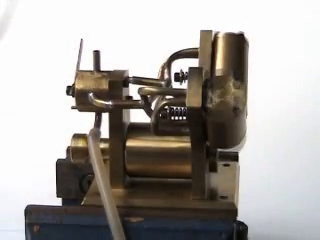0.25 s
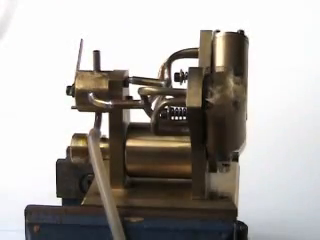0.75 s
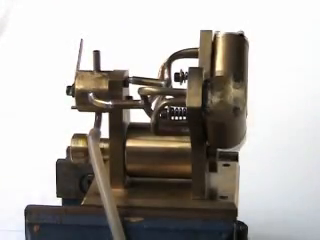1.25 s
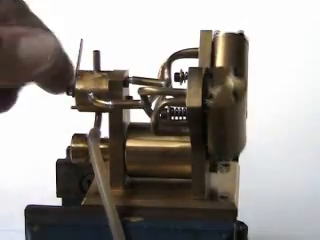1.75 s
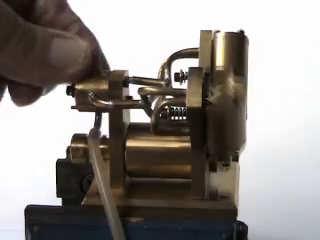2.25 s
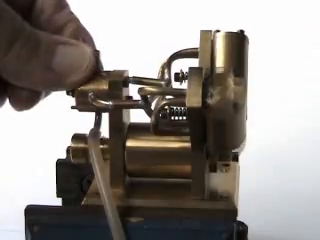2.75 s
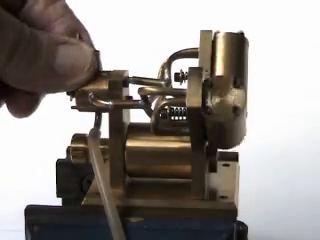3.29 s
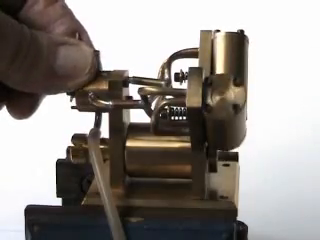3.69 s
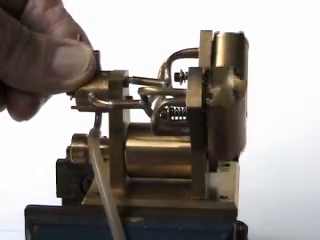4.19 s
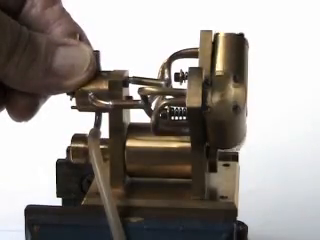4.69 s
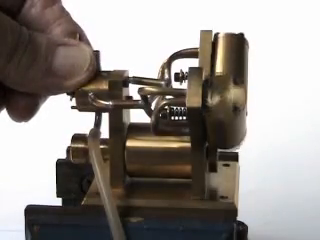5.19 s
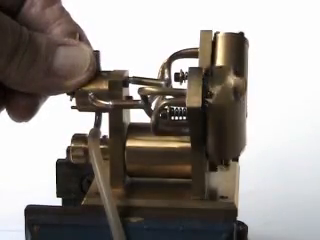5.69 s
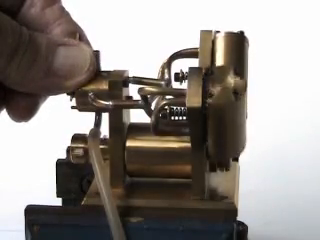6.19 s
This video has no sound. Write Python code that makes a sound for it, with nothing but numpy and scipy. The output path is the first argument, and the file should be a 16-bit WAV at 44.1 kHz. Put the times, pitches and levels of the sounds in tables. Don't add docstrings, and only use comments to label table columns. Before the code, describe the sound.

Rapid even air-exhaust chuffing with rattling metal parts drops away, nearly stops in a faint hiss, then picks up again, slower, quieter and clackier.

```python
import sys
import numpy as np
from scipy import signal
from scipy.fft import rfft, irfft, next_fast_len
from scipy.io import wavfile
from scipy.ndimage import uniform_filter1d, map_coordinates

SR = 44100
rng = np.random.default_rng(int(sys.argv[2]) if len(sys.argv) > 2 else 0)


def volts(x):
    e = np.asarray(x, float) / 20
    return 10 ** e


def pcm_store(signal):
    levels = np.round(np.clip(np.atleast_2d(signal), -1, 1) * 32767)
    wavfile.write(sys.argv[1], SR, levels.astype(np.int16).T)


N = 284004


def unit(x):
    return x / np.sqrt(np.mean(x ** 2) + 1e-20)


def along(points, hz):
    f, v = np.transpose(points)
    return np.interp(np.log(hz + 1), np.log(f + 1), v)


def curves(rows):
    s, *cols = np.transpose(rows)
    return [np.interp(np.arange(N) / SR, s, c) for c in cols]


def wobble(rate):
    knots = rng.standard_normal(int(N * rate / SR) + 4)
    return map_coordinates(knots, [np.arange(N) * rate / SR])


def filtered(x, response):
    m = next_fast_len(N + SR // 2)
    return irfft(rfft(x, m) * response(np.fft.rfftfreq(m, 1 / SR)), m)[..., :N]


def causal(gain):
    c = irfft(np.log(gain + 1e-6))
    c[1:len(c) // 2] *= 2
    c[len(c) // 2 + 1:] = 0
    return np.exp(rfft(c))[:len(gain)]


def unit_gain(response):
    return np.sqrt(np.mean(abs(response(np.linspace(1, SR / 2, num=2000))) ** 2))


def mode(f, hz, width):
    return 1j * f * width / (hz * hz - f * f + 1j * f * width)


def ringing(part):
    ring = lambda f: sum((-1) ** j * volts(db) * mode(f, hz, w) for j, (hz, w, db) in enumerate(part))
    return lambda f: ring(f) / unit_gain(ring)


# frequency [Hz], level [dB per Hz].
ROOM_TONE = [(15, -66), (30, -22), (40, -8.5), (58, -4.5), (129, -8.5), (212, -14.5), (495, -19.5),
             (1090, -19), (2500, -21), (5500, -55), (10000, -44.5)]


def room_tone():
    apart = .45
    noise = rng.standard_normal(N) + apart * rng.standard_normal((2, N))
    pair = filtered(noise, lambda f: volts(along(ROOM_TONE, f)))
    drift_db = .7 * wobble(3)
    return volts(-48.5 + drift_db) * unit(pair) * volts([[-1.2], [1.2]])


# frequency [Hz], time to die by 60 dB [s].
WALL_DECAY = [(150, 0.51), (1000, 0.43), (4000, 0.031), (10000, 0.1)]


def workshop(x):
    hz, t, z = signal.stft(rng.standard_normal((2, SR // 2)), SR, nperseg=256)
    decay = volts(-60 * t / along(WALL_DECAY, hz)[:, None])
    tail = signal.istft(z * decay, SR, nperseg=256)[1]
    delayed = np.pad(x, (300, 0))
    return signal.fftconvolve(delayed[None], tail / np.linalg.norm(tail[0]), axes=1)[:, :N]


# mode frequency [Hz], width [Hz], level [dB].
BASE_MODES = [(170, 99, -4.5), (223.7, 65, -3.5), (329.7, 32.4, -0.5), (354.8, 14.7, 2), (389, 69, -2)]
FRAME_MODES = [(608, 93, 0.83), (659, 76, 4.4)]
POST_MODES = [(796, 64, -5.5), (906.6, 38, 1.5), (1028, 104, -7)]
PIN_MODES = [(1213, 96, -3.5), (1494, 117, -2.5), (1706, 200, -3.5), (2283, 330, -5), (2653, 130, -16.5)]
SPRING_MODES = [(3252, 250, 0)]
HUM_ORDERS = [12, 14, 16, 17, 18, 19, 21, 22, 23, 25, 27, 29, 41, 43, 44, 46, 61, 65]
HUM_DB = [-47, -44, -44, -44, -45, -46, -40, -49, -45, -47, -48, -45, -55, -54, -56, -55, -57, -57]


def table_hum(turns, speed):
    hum = 0
    for order, db in zip(HUM_ORDERS, HUM_DB):
        lag = .83 * order + .15 * rng.standard_normal() + .025 * wobble(8)
        hum = hum + volts(db + wobble(2.3)) * np.cos(2 * np.pi * (order * turns - lag))
    modes = BASE_MODES + FRAME_MODES + POST_MODES
    stand = lambda f: np.sqrt(sum(abs(volts(db) * mode(f, hz, w)) ** 2 for hz, w, db in modes))
    hum_from, hum_full = 11.5, 15.2
    shake = np.clip((speed - hum_from) / (hum_full - hum_from), 0, 1)
    return volts(1.0) * filtered(shake * hum, stand)


# start [s], peak level [dB].
BIG_END_CLACKS = [(3.641, -28.5), (4.184, -23.5), (4.293, -23.5), (4.385, -26), (4.489, -31),
                  (4.599, -29.5), (4.711, -30.5), (4.824, -30.5), (4.936, -32), (5.061, -28), (5.193, -28),
                  (5.329, -27), (5.472, -27.5), (5.624, -25.5), (5.784, -25.5), (5.941, -25),
                  (6.101, -25.5), (6.264, -26)]


def big_end():
    u = np.arange(round(.06 * SR)) / SR / .006
    # part, delay in seconds, level in dB, whether it takes the varying low thud
    path = [(PIN_MODES, 0, -1, False), (POST_MODES, .001, -4, False),
            (FRAME_MODES, .003, -8, True), (BASE_MODES, .006, 2.5, True)]
    sound = 0
    for part, late, part_db, thud in path:
        force = np.zeros(N + SR)
        for s, db in BIG_END_CLACKS:
            thud_db = -12 + 4 * rng.standard_normal()
            scrape = 0.82 * u * np.exp(1 - u) * rng.standard_normal(len(u))
            scrape[60] += 14
            force[round((s + late) * SR):][:len(u)] += volts(db + thud * thud_db + part_db) * scrape
        sound = sound + filtered(force[:N], ringing(part))
    return volts(-8.5) * sound


# crank position [turns], length [turns],
# then the level into base, frame, post, pins and spring [dB].
FAST_CONTACTS = [
    (.13, 0.19, -13.5, -20, -16, -11.5, -16.5),
    (.33, 0.079, -20, -8.5, -12.5, -14.5, -7),
    (.47, 0.12, -11, -16.5, -9.5, -18, -19),
    (.6, 0.2, -13, -13, -17, -7.5, -10.5),
    (.78, 0.1, -18, -15, -9.5, -5.5, -4),
    (.91, 0.065, -3, -25.5, -7, -13, -17),
]
SLOW_CONTACTS = [
    (.05, .07, -3, -10, -6, -17, -16),
    (.33, .07, -5, -6, -8, -15, -11),
    (.5, .09, -6, -13, -15, -20, -18),
    (.72, .08, -9, -14, -15, -10, -3),
    (.88, .07, -3, -9, -9, -16, -8),
]
WORN_SHARE = [.93, .88, .8, .2, .1]
FULL_SPEED = 15


def linkage(turns, speed, slow):
    late = round(.045 * SR)
    felt_speed = np.pad(speed, (late, 0), 'edge')[:N]
    link_db = -34.5 - 2.5 * slow + 5.5 * np.log2(felt_speed / FULL_SPEED)
    angle = turns % 1
    bump_count, wear_turns = 700, 7
    sound = 0
    for k, part in enumerate([BASE_MODES, FRAME_MODES, POST_MODES, PIN_MODES, SPRING_MODES]):
        force = 0
        for contacts, pace in ((FAST_CONTACTS, ~slow), (SLOW_CONTACTS, slow)):
            for row in contacts:
                away = ((angle - row[0] + .5) % 1 - .5) / row[1]
                away = np.where(away < 0, 2.55 * away, away)
                turn_number = np.round(turns - row[0]).astype(int) + 1
                slack_db = 0.67 * rng.standard_normal(100)[turn_number]
                force = force + pace * volts(row[2 + k] + slack_db) * np.exp(-away ** 2)
        bumps = rng.standard_normal((30, bump_count))
        surface = map_coordinates(bumps, [turns / wear_turns, np.floor(angle * bump_count)])
        surface = surface * np.sqrt(bump_count * speed / SR)
        fresh = rng.standard_normal(N) * volts(1.01 * wobble(500))
        rubbing = np.sqrt(WORN_SHARE[k]) * surface + np.sqrt(1 - WORN_SHARE[k]) * fresh
        sound = sound + filtered(force * 2.47 * rubbing * volts(link_db), ringing(part))
    return volts(-0.5) * sound


def patchy(depth_db):
    z = signal.stft(rng.standard_normal(N), nperseg=256)[2]
    field = uniform_filter1d(rng.standard_normal(z.shape), size=5, axis=0)
    field = uniform_filter1d(field, size=4, axis=1)
    return unit(signal.istft(z * volts(depth_db * unit(field)), nperseg=256)[1][:N])


# frequency [Hz], level [dB per Hz].
JET_COLOUR = [(100, -41.5), (400, -6), (1000, -10), (2500, -10.5), (2950, -3.5), (4000, -3.5), (5200, -1),
              (6500, -2), (8000, -6.5), (10000, -1), (12000, -23.5)]
# frequency [Hz], width [Hz], then level over the jet [dB] for the first and
PIPE_MODES = [(2180, 170, -13, 8, -22, -12, -25), (2810, 180, 2.5, 0, -19, -26, 6),
              (3075, 360, 7, 0.5, -0.5, -22, 7.5), (3287, 160, 7.5, 9, 1.5, 2.5, 1),
              (4076, 130, -13, -23, 5, 3, 10), (4490, 49, 4, 3.5, 6.5, 5.5, 6),
              (4700, 60, 1.5, 7.5, 5.5, -5, 8.5), (5590, 124, 3, 11, 3, 1.5, 5),
              (5950, 86, -9, 3, 4.5, 5, 1), (6250, 570, -6, 8, -1, -3.5, 3.5),
              (6820, 180, 4, -4, -9, -9, -9), (7450, 370, 4, 11.5, -17, -13, 0),
              (7760, 98, 11, -5, 7, 6, 8), (8360, 150, 8.5, -18, 4, -9, 3),
              (10030, 230, 6.5, 3, 7.5, 0.5, 6.5)]


def port_pipes(f, k):
    bass_db = [0, 0, -1, -1, -13][k] / (1 + (f / 1500) ** 2)
    peaks = sum(abs(volts(p[2 + k]) * mode(f, *p[:2])) ** 2 for p in PIPE_MODES)
    return volts(along(JET_COLOUR, f) + bass_db) * np.sqrt(1 + peaks)


# share of stroke [0-1], level at full air [dB], throttled [dB].
PORT_OPENING = [(0, -11.5, -11), (.09, -10.5, -8.5), (.18, -2, -1.5), (.45, 0, 0), (.65, -1.5, -.6),
                (.8, -5.5, -3), (.92, -10, -7.5), (1, -11.5, -11)]
# time [s], jet level [dB].
LEVER_AIR = [(0, -24.5), (1.6, -25), (3.05, -25), (3.25, -25), (3.37, -28.5), (3.45, -30), (3.54, -31),
             (3.6, -35.5), (3.67, -31.5), (3.715, -37), (3.735, -34), (3.84, -40), (4.1, -34), (4.14, -33),
             (4.16, -26), (4.6, -27), (5.2, -29.5), (6.44, -31.5)]
STALL_START, STALL_END = 3.69, 4.14


def exhaust(turns, slow):
    air_db, = curves(LEVER_AIR)
    t = np.arange(N) / SR
    angle = turns % 1
    split = .48
    second = angle >= split
    stroke = np.where(second, (angle - split) / (1 - split), angle / split)
    share, full, throttled = np.transpose(PORT_OPENING)
    open_db = np.where(slow, np.interp(stroke, share, throttled), np.interp(stroke, share, full))
    stroke_number = (2 * np.floor(turns) + second).astype(int)
    charge_db = 0.32 * rng.standard_normal(200)[stroke_number]
    eddies_db = 0.11 * wobble(300) + 1.04 * wobble(2500)
    second_db = second * np.where(slow, -2.5, 1.5)
    flow = volts(open_db + charge_db + eddies_db + air_db + second_db)
    state = np.where((t > STALL_START) & (t < STALL_END), 4, 2 * slow + second)
    jets = 0
    for k, depth_db in enumerate([0.7, 2.9, 1.9, 0.27, 1.3]):
        pipes = lambda f: port_pipes(f, k)
        hiss = (state == k) * flow * patchy(depth_db)
        jets = jets + filtered(hiss, lambda f: causal(pipes(f))) / unit_gain(pipes)
    return jets


# time [s], speed [turns a second].
SHAFT_SPEED = [(0, 15.05), (1.07, 14.926), (2.67, 14.104), (3.02, 14.017), (3.34, 9.394), (3.36, 6.864),
               (3.41, 7.312), (3.74, 2.317), (3.8, .321), (4.04, .314), (4.14, 3.933), (4.21, 9.505),
               (4.58, 10.296), (4.62, 8.882), (5.07, 8.101), (5.25, 7.258), (5.74, 6.259), (6.44, 6.035)]
START_TURN = .088
THROTTLED_AT = 3.115


def scene():
    speed, = curves(SHAFT_SPEED)
    turns = START_TURN + np.cumsum(speed) / SR
    slow = np.arange(N) / SR > THROTTLED_AT
    air = exhaust(turns, slow)
    metal = linkage(turns, speed, slow) + big_end() + table_hum(turns, speed)
    metal = filtered(metal, lambda f: 1 / (1 + (130 / (f + 1)) ** 4))
    echo = workshop(volts(-11.0) * air + volts(-17) * metal)
    return air + metal + echo + room_tone()


# frequency [Hz], share of blocks in which the left-right difference survives [0-1].
WIDTH_KEPT = [(400, 1), (900, .7), (3000, .55), (4000, .14), (7000, .2), (9500, .38)]


def broken_width(x):
    mid, side = (x[0] + x[1]) / 2, (x[0] - x[1]) / 2
    hz, t, z = signal.stft(side, SR, nperseg=1024)
    band = (6 * np.log2(1 + hz / 1200)).astype(int)
    frame = (t / .046).astype(int)
    shape = (band.max() + 1, frame.max() + 1)
    luck = np.where(rng.random(shape) < .5, rng.random(shape[1]), rng.random(shape))
    kept = luck[band][:, frame] < along(WIDTH_KEPT, hz)[:, None]
    side = signal.istft(z * kept, SR, nperseg=1024)[1][:N]
    return np.array([mid + side, mid - side])


def low_pass(x):
    return signal.sosfilt(signal.butter(12, 12750, fs=SR, output="sos"), x)


# frequency [Hz], phase by which left leads [radians].
PORT_LEAD = [(20, 2.5), (55, 1.5), (100, 1.1), (200, .62), (320, .45), (600, .1), (2000, 0)]


def record(dry):
    ports = filtered(dry, lambda f: np.exp(.5j * along(PORT_LEAD, f) * [[1], [-1]]))
    x = filtered(broken_width(ports), lambda f: 1 / (1 + (f / 9900) ** 160))
    present = wobble(18) > -.4
    mirror = x.mean(0) * (-1.) ** np.arange(N) * present * volts(-23.5)
    mirror = filtered(mirror, lambda f: (f > 12050) & (f < 12300))
    return low_pass(x + mirror)


dry = scene()
out = record(dry)
pcm_store(out)
```